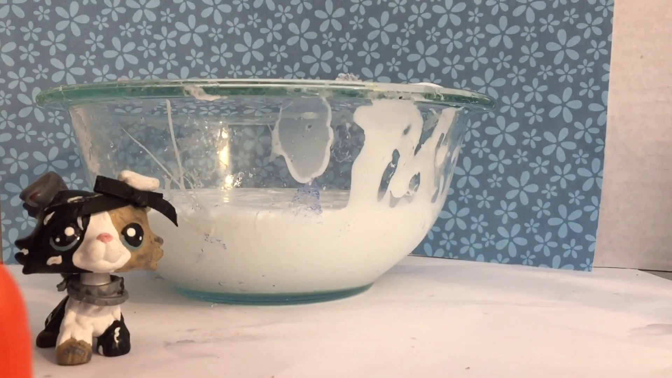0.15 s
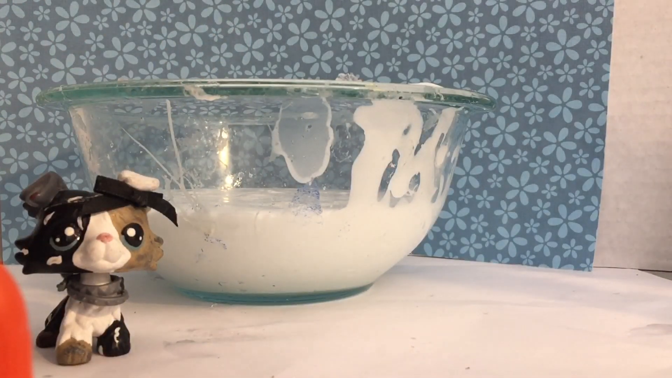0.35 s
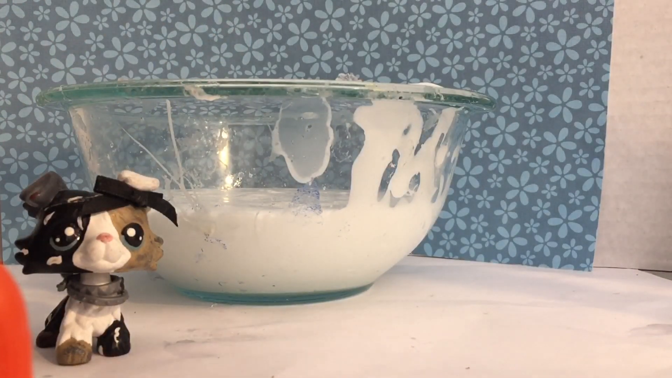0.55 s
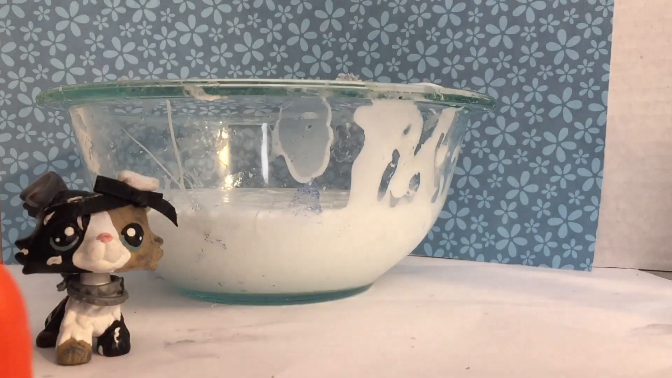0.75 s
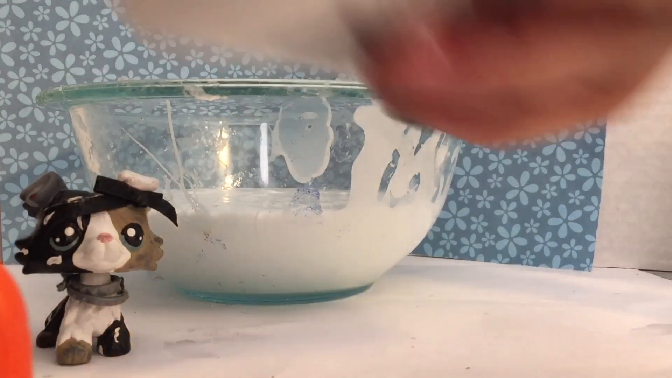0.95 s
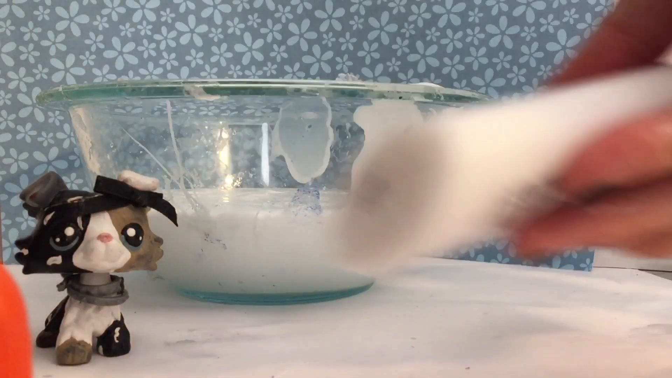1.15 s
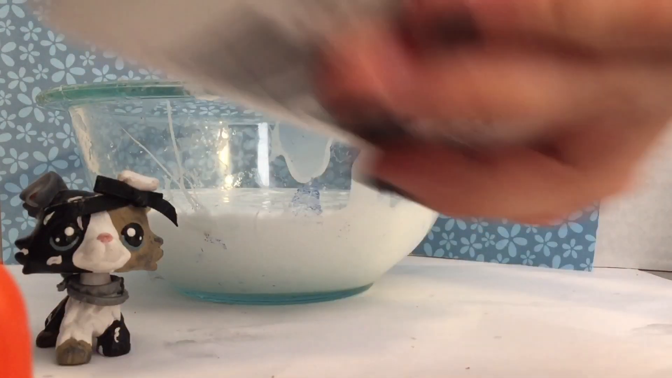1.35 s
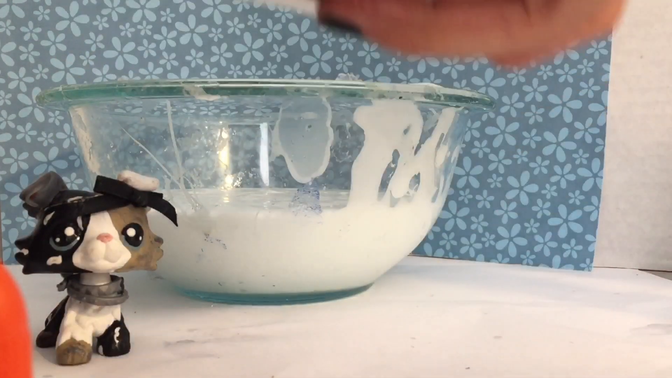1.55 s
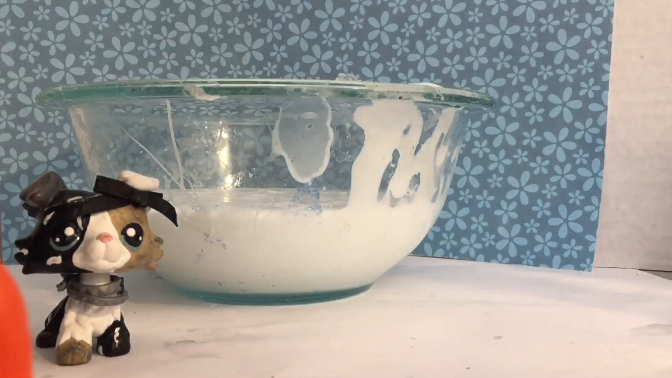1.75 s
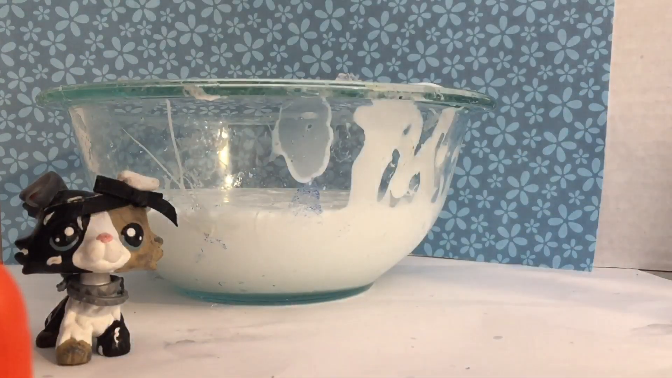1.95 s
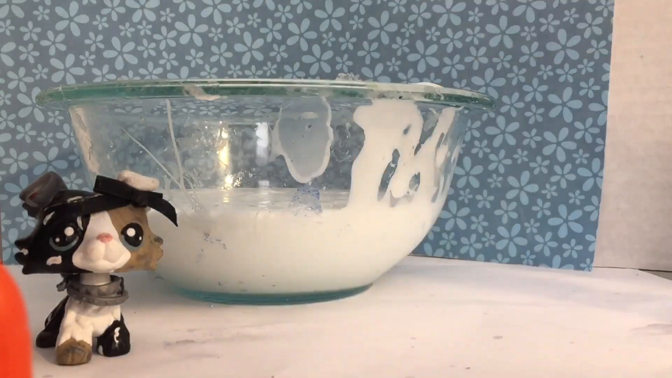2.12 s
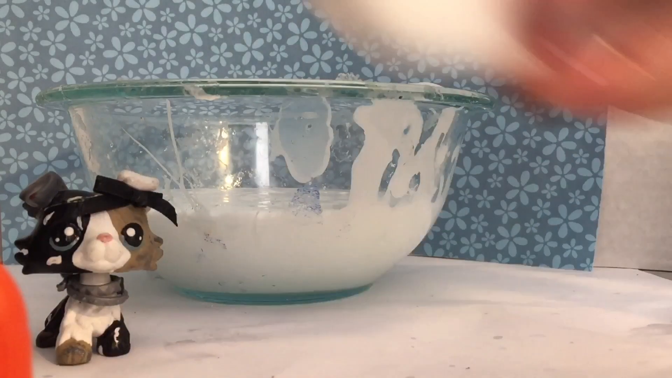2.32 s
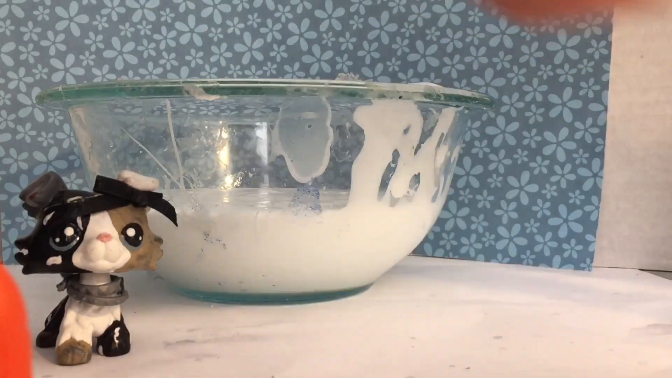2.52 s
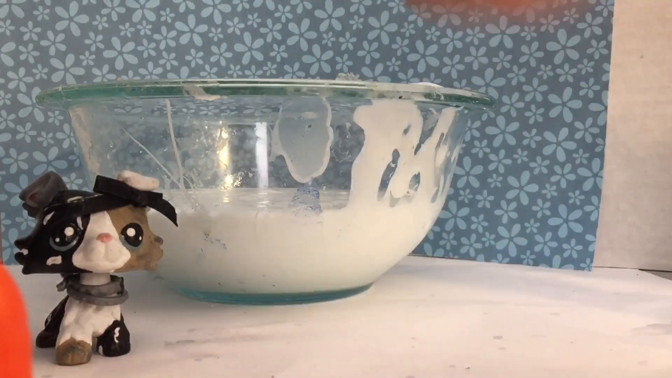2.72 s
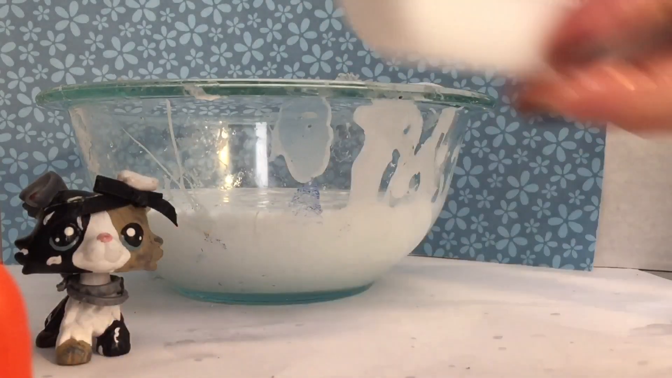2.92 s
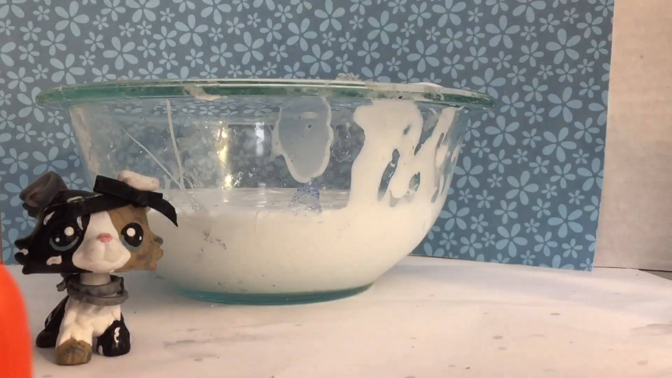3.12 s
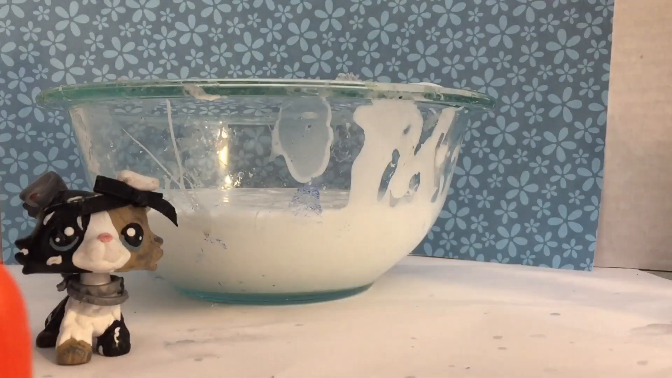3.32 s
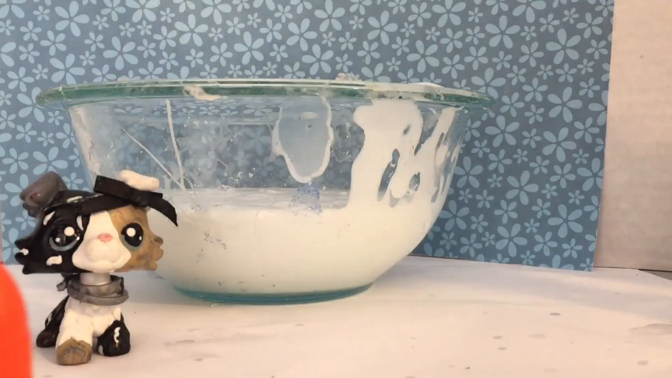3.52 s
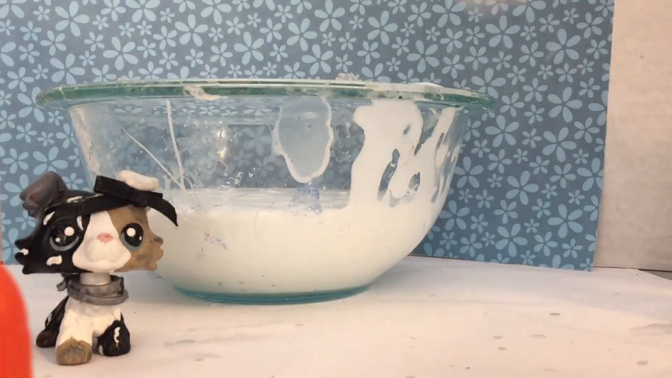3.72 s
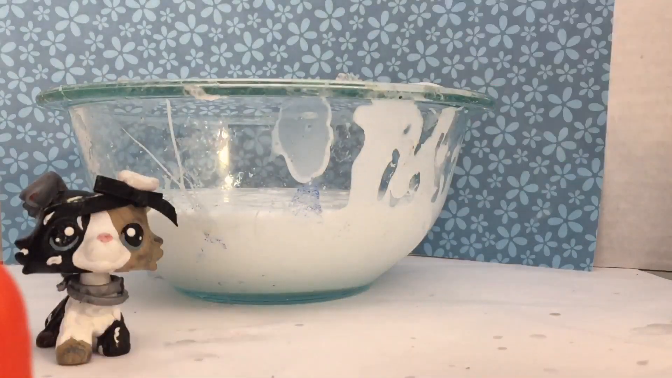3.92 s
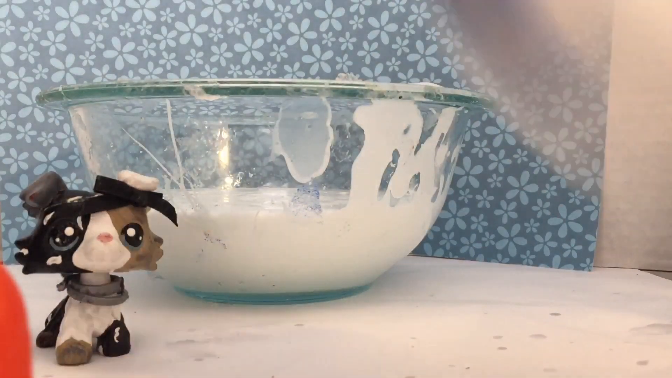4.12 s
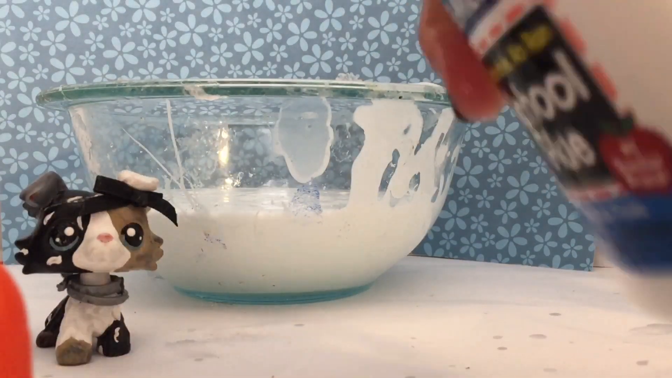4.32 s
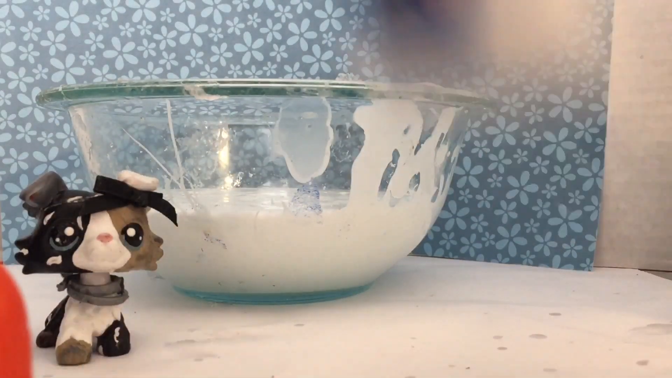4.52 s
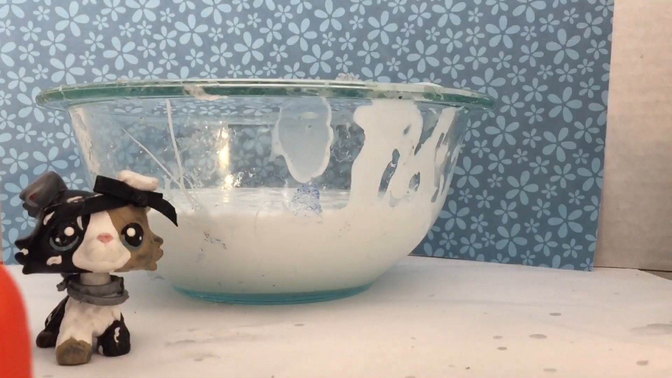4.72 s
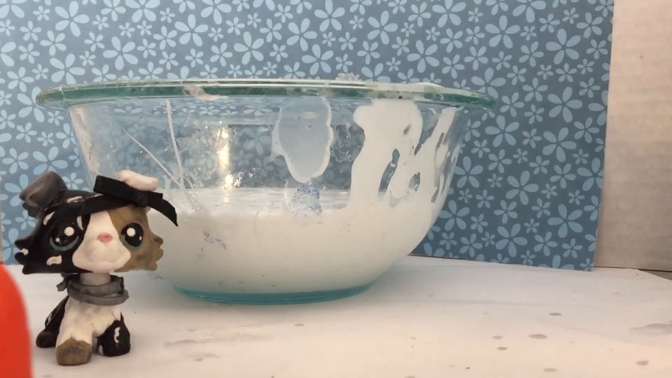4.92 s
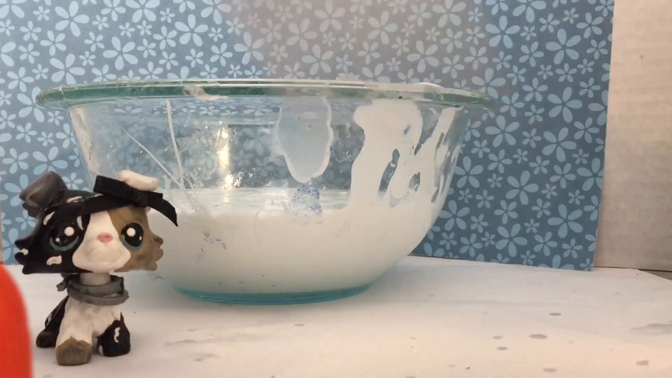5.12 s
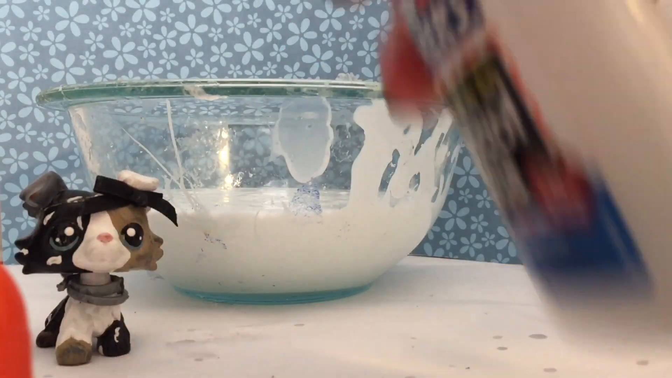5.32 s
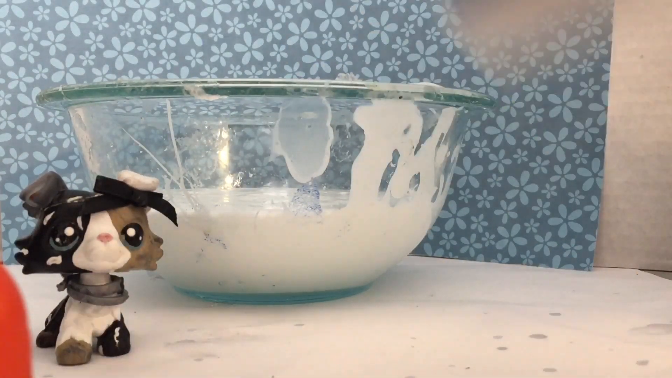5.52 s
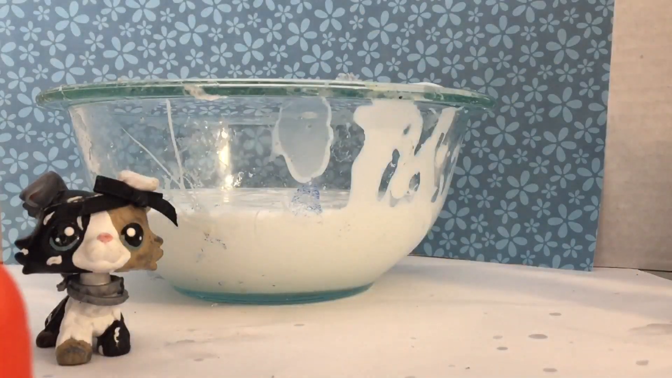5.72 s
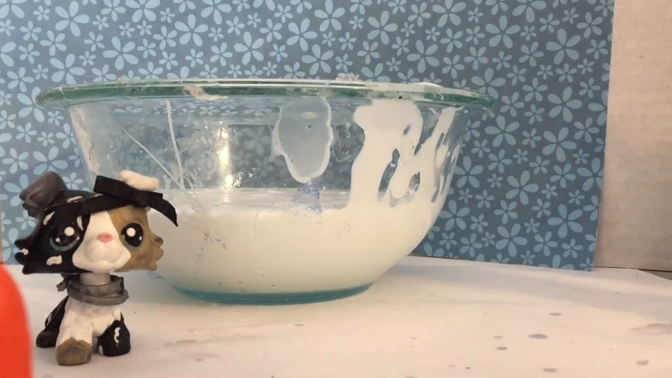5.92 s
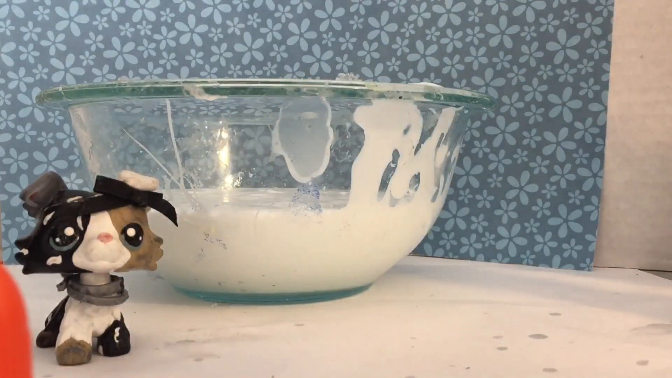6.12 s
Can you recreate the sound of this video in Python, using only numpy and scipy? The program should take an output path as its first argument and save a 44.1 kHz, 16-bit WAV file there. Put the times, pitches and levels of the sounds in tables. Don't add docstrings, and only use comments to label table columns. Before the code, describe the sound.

Close up in a small quiet room, faint clicks and a light table touch come first. Then a soft plastic bottle of thin, watery glue is shaken fast in three bursts, each stroke a bubbly slosh with bright spray and hollow gulps. Finger rings tick on the plastic, a hand thumps the table between bursts, and the last burst is longest and loudest. A faint appliance hum sinks away.

```python
import sys
import numpy as np
from scipy import signal
from scipy.fft import rfft, irfft, next_fast_len
from scipy.io import wavfile
from scipy.ndimage import uniform_filter1d, map_coordinates

SR = 44100
rng = np.random.default_rng(int(sys.argv[2]) if len(sys.argv) > 2 else 0)


def volts_from_db(level):
    exponent = np.asarray(level, float) / 20
    return 10 ** exponent


def wav_out(sig):
    wavfile.write(sys.argv[1], SR, np.round(np.clip(np.atleast_2d(sig).T, -1, 1) * 32767).astype(np.int16))


N = 271215
TIME = np.arange(N) / SR
TOP_HZ = 15900
BUBBLE_HZ = 846


def unit(x):
    return x / np.sqrt(np.mean(x ** 2) + 1e-20)


def along(points, hz):
    f, v = np.transpose(points)
    return np.interp(np.log(hz + 1), np.log(f + 1), v)


def filtered(x, response):
    m = next_fast_len(N + SR // 2)
    return irfft(rfft(x, m) * response(np.fft.rfftfreq(m, 1 / SR)), m)[:N]


def coloured(x, spectrum):
    return unit(filtered(x, lambda hz: volts_from_db(along(spectrum, hz))))


def resonance(f, centre_hz, width_hz):
    damping = 1j * f * width_hz
    return damping / (centre_hz ** 2 - f * f + damping)


def wobble(rate):
    return map_coordinates(rng.standard_normal(int(N * rate / SR) + 4), [TIME * rate])


def patchy(x, depth_db):
    z = signal.stft(x, nperseg=128)[2]
    field = uniform_filter1d(rng.standard_normal(z.shape), size=5, axis=0)
    field = uniform_filter1d(field, size=9, axis=1)
    return signal.istft(z * volts_from_db(depth_db * unit(field)), nperseg=128)[1][:N]


def blips(s, size, hz, cycles, soft, climb):
    life = (cycles / hz)[:, None]
    k = np.arange(-160, 420)
    t = k / SR
    rise = np.exp(-(t / (soft * life)) ** 2)
    fall = np.exp(-(np.abs(t) / (0.21 * life)) ** 0.43)
    shape = np.where(t < 0, rise, fall) * signal.windows.tukey(len(k), 0.2)
    start_phase = rng.random((len(s), 1))
    tone = np.cos(2 * np.pi * (hz[:, None] * (t + climb * t * t / life) + start_phase))
    at = np.clip(np.round(s * SR).astype(int)[:, None] + k, 0, N)
    return np.bincount(at.ravel(), (size[:, None] * shape * tone).ravel(), N + 1)[:N]


def swell(s, db, rise, fall, edge=1.46):
    power = np.zeros(N)
    for at, level, up, down in zip(s, db, rise, fall):
        near = slice(max(int((at - 4 * up) * SR), 0), int((at + 4 * down) * SR))
        t = TIME[near] - at
        distance = np.abs(t / np.where(t < 0, up, down))
        power[near] += volts_from_db(2 * level - 17.45 * distance ** np.where(t < 0, edge, 1.9))
    return power


# [peak t/s, level/dB rms, rise t/s, fall t/s]
FIRST_BURST = [(.824, -76, .042, 0.03), (0.857, -37, 0.0034, 0.01), (.886, -50, 0.043, 0.015),
               (0.943, -34.5, 0.0097, 0.024), (1.021, -32, 0.027, 0.015), (1.08, -32, 0.012, 0.031),
               (1.142, -28, 0.0028, 0.031), (1.23, -26.5, 0.017, 0.017), (1.294, -33.5, 0.038, 0.018),
               (1.366, -31, 0.032, 0.0088), (1.419, -27, 0.025, 0.029), (1.497, -29.5, 0.031, 0.0068),
               (1.547, -32, 0.039, 0.02), (1.586, -34, 0.013, 0.028), (1.626, -40.5, 0.0055, 0.023)]
# [peak t/s, level/dB rms, rise t/s, fall t/s]
SECOND_BURST = [(2.196, -46, 0.046, 0.016), (2.26, -25, 0.021, 0.018), (2.332, -28, 0.025, 0.0059),
                (2.411, -29.5, 0.023, 0.016), (2.479, -27.5, 0.013, 0.015), (2.559, -25, 0.017, 0.01),
                (2.622, -26, 0.027, 0.017), (2.689, -29, 0.01, 0.031), (2.771, -23.5, 0.028, 0.0092),
                (2.834, -37, 0.056, 0.072), (2.9, -21.5, 0.006, 0.0084), (2.97, -32.5, 0.015, 0.065),
                (3.044, -24.5, 0.0099, 0.018), (3.11, -37, 0.021, 0.015), (3.146, -39.5, .026, 0.023)]
# [peak t/s, level/dB rms, rise t/s, fall t/s]
DOWN_STROKES = [(3.821, -27, 0.034, 0.02), (3.983, -25, 0.039, .026), (4.155, -22, 0.048, .0089),
                (4.286, -25.5, 0.028, 0.029), (4.461, -23, 0.029, 0.017), (4.62, -21, 0.021, 0.021),
                (4.795, -22.5, 0.036, 0.017), (4.956, -20, 0.016, 0.023), (5.13, -19.5, 0.029, 0.012),
                (5.297, -23, 0.055, 0.011), (5.447, -23, 0.052, 0.016), (5.621, -26, 0.035, 0.011),
                (5.913, -26, 0.021, 0.028), (6.084, -21.5, 0.023, 0.011)]
# [peak t/s, level/dB rms, rise t/s, fall t/s]
FALL_BACKS = [(3.761, -31, 0.0084, 0.013), (3.911, -25.5, 0.0082, 0.02), (4.084, -34, 0.036, 0.011),
              (4.229, -29, 0.022, 0.039), (4.394, -28, 0.021, 0.0083), (4.551, -32.5, 0.013, 0.04),
              (4.713, -32, 0.012, 0.049), (4.891, -29.5, 0.012, 0.036), (5.053, -25.5, 0.017, 0.028),
              (5.216, -28, 0.0091, 0.011), (5.358, -27, 0.0064, 0.024), (5.542, -32, 0.024, 0.036),
              (5.822, -29, 0.012, 0.0072), (6.008, -33, 0.015, 0.012)]
EXTRA_SPRAY = [
    [.3, .3, .3, 0.25, .3, .3, 0.48, 0.28, .3, .3, 0.33, 0.34, .3, .3, .3],
    [.3, .3, .3, 0.24, 0.297, 0.298, .3, .3, .3, .3, .3, .3, .3, .3, .3],
    [0.32, 0.25, .3, .3, 0.27, .3, .3, 0.26, .3, 0.25, 0.33, .3, 0.33, 0.41],
    [.3, .3, .3, .3, .3, .3, .3, 0.33, .3, .3, .3, .3, .3, .3],
]
# [peak t/s, level/dB rms, half length t/s, bubble f/Hz]
LUMPS = [(0.97, -39, 0.018, 696), (1.696, -42, 0.0056, 526), (2.94, -22, 0.0025, 735),
         (3.23, -38.5, 0.031, 500), (3.33, -59.5, 0.18, 302), (4.037, -32.5, .013, 840),
         (4.498, -39, 0.0077, 1330), (5.332, -29, 0.006, 510), (5.784, -33, 0.0032, 940),
         (5.866, -33, 0.014, 364), (5.977, -35.5, 0.015, 1265)]


def surges():
    rows = [(s, db, half, half, -17.5, hz) for s, db, half, hz in LUMPS]
    strokes = FIRST_BURST + SECOND_BURST + DOWN_STROKES + FALL_BACKS
    for (s, db, rise, fall), extra_db in zip(strokes, sum(EXTRA_SPRAY, [])):
        force_db = db + 29.5
        spray_db = -5 + extra_db - 0.36 * force_db
        rows.append((s, db, rise, fall, spray_db, BUBBLE_HZ * np.exp(-0.013 * force_db)))
    return np.transpose(sorted(rows))


# [f/Hz, width f/Hz, level/dB]
BOTTLE_MODES = [(295, 156, -1), (709, 93, 5.5), (1050, 175, -6), (1613, 326, 0), (3730, 2540, -14.5)]


def bottle(f):
    return sum((-1) ** k * volts_from_db(db) * resonance(f, hz, width)
               for k, (hz, width, db) in enumerate(BOTTLE_MODES))


def slosh(s, pitch_hz, clump):
    at = rng.random(3000) * N / SR
    spread, size, life = rng.standard_normal((3, 3000))
    hz = np.clip(np.interp(at, s, pitch_hz) * np.exp(0.5 * spread), 250, 4000)
    size = volts_from_db(3.1 * np.clip(size, -1.6, 1.6)) * np.minimum(hz / 700, 1) ** 1.13
    bubbles = unit(blips(at, size, hz, 3.1 * np.exp(0.67 * life), soft=0.4, climb=0.054))
    through_wall = unit(filtered(bubbles, bottle))
    turbulence = volts_from_db(6.1 * np.tanh(wobble(160))) * rng.standard_normal(N)
    walls = unit(filtered(turbulence, bottle))
    body = unit(volts_from_db(7.4 * clump) * (0.49 * bubbles + 0.39 * through_wall + 0.49 * walls))
    return unit(body / np.abs(uniform_filter1d(body ** 2, size=700) + 0.05) ** 0.32)


# [f/Hz, level/dB per Hz]
SPRAY_COLOUR = [(1060, 2.5), (1800, -10), (2300, -12.5), (4020, -5), (7560, -10), (9590, -12.5),
                (11200, -19.5), (14900, -19), (16000, -25)]


def fine_spray(clump):
    at, spread = rng.random(7000) * N / SR, rng.random(7000)
    size, life = rng.standard_normal((2, 7000))
    size = volts_from_db(6 * np.clip(size, -1.8, 1.6))
    drops = unit(blips(at, size, 1500 * 7.63 ** spread, 4.04 * np.exp(0.7 * life), soft=0.39, climb=0.076))
    mist = volts_from_db(2.8 * wobble(250)) * rng.standard_normal(N)
    crackle = np.diff(volts_from_db(6 * np.clip(wobble(420), -3, 2)) * mist, prepend=0)
    mix = 0.8 * drops + 0.67 * unit(mist) + 0.83 * unit(crackle)
    return coloured(patchy(volts_from_db(3.34 * clump) * mix, depth_db=3.5), SPRAY_COLOUR)


# [t/s, level/dB]
WALL_FLOW = [(.78, -87), (.86, -54.5), (1.1, -44), (1.58, -40.5), (1.68, -59.5), (1.78, -73), (2.08, -68),
             (2.2, -44), (2.45, -39.5), (3.1, -45.5), (3.28, -75), (3.66, -80), (3.7, -76), (3.76, -49.5),
             (4.9, -48.5), (5.6, -48.5), (6.15, -43.5)]


def liquid():
    s, db, rise, fall, spray_db, pitch_hz = np.transpose(surges().T)
    flow_s, film_db = np.transpose(WALL_FLOW)
    trickle_db = -55 + 0.75 * (film_db - np.median(film_db))
    trickle = volts_from_db(2 * np.interp(TIME, flow_s, trickle_db))
    slosh_level = np.sqrt(swell(s, db - 0.5, rise, fall) + trickle)
    spray_level = np.sqrt(swell(s, db + spray_db, 1.04 * rise, 1.014 * fall, edge=2.2))
    clump = np.tanh(wobble(110))
    body, spray = slosh(s, pitch_hz, clump), fine_spray(clump)
    film = unit(filtered(volts_from_db(1.04 * wobble(90)) * spray[::-1], lambda f: 2.0 + 1 / (1 + (f / 6000) ** 2)))
    return slosh_level * body + spray_level * spray + volts_from_db(np.interp(TIME, flow_s, film_db)) * film


# [peak t/s, level/dB, f/Hz]
BIG_POCKETS = [(1.276, -9, 730), (1.525, -15, 1050), (2.2499, -16, 620), (2.3109, -13, 824),
               (2.3275, -10.5, 1050), (2.3983, -17, 1130), (2.731, -16, 900), (2.7428, -6.5, 706),
               (2.7669, -9, 1000), (2.9008, -4, 810), (3.0419, -10.5, 350), (3.1696, -16, 850),
               (3.913, -9, 1050), (4.2766, -5.5, 705), (4.3782, -12, 760), (4.431, -14, 900),
               (4.4383, -10, 820), (4.4624, -4.5, 685), (4.4678, -9, 610), (4.621, -2.5, 680),
               (4.89, -15.5, 1270), (4.9522, -9, 700), (4.9627, -21, 425), (5.065, -2.5, 640),
               (5.108, -2.5, 940), (5.1199, -4.5, 684), (5.214, -12.5, 850), (5.3551, -12, 960),
               (5.4207, -12, 950), (5.611, -2.5, 604), (5.9227, -12, 1160), (6.0848, -9, 442)]
# [peak t/s, level/dB, f/Hz]
SMALL_POCKETS = [(0.8565, -26.5, 1300), (1.433, -21, 1230), (2.415, -17, 1550), (2.477, -19, 1650),
                 (2.9, -19.5, 2800), (2.9832, -17, 1570), (3.0456, -12.5, 2000), (3.9765, -7.5, 1860),
                 (4.2842, -11, 3000), (4.2933, -15.5, 2100), (4.2981, -19, 1720), (4.6313, -11, 1480),
                 (4.777, -11.5, 2830), (4.7877, -14, 1430), (4.9622, -12, 1770), (5.05, -15, 3000),
                 (5.1087, -18, 2520), (5.13, -15, 1650), (5.4315, -5, 1680), (5.6205, -11.5, 1600),
                 (5.7249, -13.5, 2320), (5.911, -15, 2230), (5.9784, -20, 1610), (6.084, -11, 2070)]


def gulps():
    s, db, hz = np.transpose(BIG_POCKETS + SMALL_POCKETS)
    cycles = 4.53 * np.exp(0.03 * (-13 - db)) * (hz / BUBBLE_HZ) ** 0.23
    return blips(s, volts_from_db(db - 3.5), hz, 0.65 * cycles, soft=0.57, climb=0.014)


# [peak t/s, level/dB, f/Hz]
PLOPS = [(0.9624, -26, 1550), (1.0093, -27, 3270), (1.333, -20.5, 1120), (1.3661, -21, 690),
         (1.4002, -23, 3360), (1.479, -29, 1810), (1.5231, -25, 690), (1.5801, -30, 960),
         (2.2488, -25, 3450), (2.4382, -28.9, 1640), (2.4528, -22, 1030), (2.4813, -25.1, 2670),
         (2.5178, -25, 600), (2.6886, -15, 705), (2.709, -21, 1380), (2.7305, -30, 2840),
         (2.8994, -19.5, 3600), (2.974, -24, 1720), (3.081, -26, 690), (3.1465, -27.5, 950),
         (3.7595, -28.5, 1900), (3.761, -21.5, 1130), (3.8189, -22, 1630), (3.9124, -19, 3450),
         (3.984, -15, 1830), (4.0841, -29, 4050), (4.1075, -18, 520), (4.1276, -28, 3360),
         (4.1551, -17, 3960), (4.2277, -18, 600), (4.2975, -23, 1640), (4.3113, -24, 3930),
         (4.5376, -23, 950), (4.6007, -11.5, 786), (4.6215, -24, 1650), (4.642, -14, 694),
         (4.7082, -17, 705), (4.889, -20.5, 4130), (4.9523, -13, 680), (4.9641, -17.5, 3080),
         (5.0303, -23.5, 430), (5.0641, -25, 3380), (5.1293, -21, 1640), (5.2166, -26, 2500),
         (5.257, -18, 1470), (5.2685, -25.2, 2500), (5.3572, -15.5, 3190), (5.3634, -16, 950),
         (5.4502, -13.5, 670), (5.4558, -18, 1640), (5.5691, -21, 690), (5.6216, -27, 2760),
         (5.668, -36, 2330), (5.7848, -28.5, 1460), (5.8026, -27.4, 1460), (5.8175, -20, 1140),
         (5.864, -23, 1120), (5.889, -23, 3620), (5.8895, -28.7, 1790), (5.91, -21, 4050)]
# [t/s, peak level/dB, centre f/Hz]
SPITS = [(0.7938, -38, 15330), (0.8359, -27, 9300), (0.8897, -37, 4650), (1.022, -24, 4760),
         (1.146, -22.5, 12430), (1.1908, -30, 9650), (1.212, -21.5, 5680), (1.2872, -33.5, 13260),
         (1.2944, -19, 15400), (1.3168, -35, 15330), (1.3256, -25, 12100), (1.421, -23, 15330),
         (1.4337, -20, 9820), (1.4778, -34, 4650), (1.4943, -19, 5450), (1.5017, -29.6, 4650),
         (1.6159, -23.8, 13260), (2.24, -28, 10680), (2.352, -19.5, 9700), (2.4656, -30, 13850),
         (2.476, -21.5, 4650), (2.6246, -19, 4650), (2.6517, -22, 12580), (2.734, -23, 9300),
         (2.7537, -18, 4760), (2.7574, -13, 13780), (2.899, -14, 9300), (2.8996, -15, 4650),
         (2.929, -27.5, 13260), (3.0256, -26, 15300), (3.8223, -22.5, 11760), (4.0005, -25.2, 5510),
         (4.2085, -32, 5860), (4.2827, -23, 4650), (4.3378, -32.5, 15400), (4.3482, -23, 8700),
         (4.3506, -36.4, 14810), (4.3798, -31, 4650), (4.4457, -24.1, 4650), (4.4894, -38, 15330),
         (4.6329, -28.5, 13700), (4.7129, -35, 15160), (4.7416, -30.0, 4650), (4.7518, -28, 9400),
         (4.9408, -31, 15400), (5.1263, -28, 4650), (5.2156, -18, 7410), (5.3214, -40.1, 15330),
         (5.3574, -15, 5360), (5.4473, -28, 12300), (5.4926, -34, 12400), (5.5755, -30, 4650),
         (5.6115, -23.3, 4650), (5.977, -24, 4650), (6.0623, -16, 12400)]


def droplets():
    s, db, hz = np.transpose(PLOPS)
    out = blips(s, volts_from_db(db - 1.0), hz, 3.4 * (hz / BUBBLE_HZ) ** 0.5, soft=0.45, climb=0.022)
    s, db, hz = np.transpose(SPITS)
    for detune in np.exp(0.17 * rng.standard_normal((3, len(s)))):
        out = out + blips(s, volts_from_db(db - 8), np.minimum(hz * detune, TOP_HZ), 8, soft=0.6, climb=0.01)
    return out


# [t/s, peak level/dB, centre f/Hz]
FINGER_CLICKS = [(0.1797, -41.5, 10300), (0.224, -43.5, 11200), (0.2797, -52, 8400), (0.4744, -55, 2610),
                 (0.5077, -41, 10800), (0.5281, -45, 9900), (0.6425, -52, 4260), (0.697, -42, 6700)]
# [t/s, peak level/dB, centre f/Hz]
WET_SNAPS = [(0.793, -31.5, 2720), (0.822, -32, 5600), (0.854, -29, 2560), (1.2115, -20, 6200),
             (1.294, -19, 9100), (1.476, -22, 2970), (1.551, -16, 2300), (1.6152, -24, 9900),
             (1.694, -36, 2570), (1.8232, -44, 2630), (2.106, -43, 3990), (2.1503, -29, 5550),
             (2.1963, -18, 9300), (2.2383, -37, 3600), (2.3203, -23, 1910), (2.4735, -14, 9700),
             (2.7283, -17.5, 2040), (2.8847, -25, 6800), (2.8979, -14, 2930), (2.928, -25.5, 2100),
             (3.039, -12, 2000), (3.107, -34, 3190), (3.163, -46, 11040), (3.21, -42.5, 9520),
             (3.226, -41, 12000), (3.243, -37, 13000), (3.316, -52.5, 11960), (3.354, -46.5, 9900),
             (3.58, -45.5, 8900),
             (3.745, -29.5, 3920), (3.758, -19.5, 1930), (3.905, -11, 4300), (4.116, -36, 8940),
                    (4.2026, -32, 6420), (4.281, -22, 3260), (4.334, -27.5, 14600), (4.341, -29.5, 14400),
                    (4.376, -35.5, 12100), (4.536, -31.5, 5000), (4.4355, -20.5, 2860),
                    (4.706, -27.5, 4100), (4.877, -21, 4120), (5.1252, -13, 3130), (5.214, -27, 3380),
                    (5.4455, -19, 2560), (5.512, -29, 3980), (5.6187, -12.5, 5870), (5.771, -34, 8700),
                    (5.7814, -41, 2340), (5.803, -32, 2030), (5.889, -21.5, 2330), (6.051, -22, 3800)]


def snaps():
    out, t = np.zeros(N + SR), np.arange(600) / SR
    f = np.fft.rfftfreq(1024, 1 / SR)
    for s, db, hz in FINGER_CLICKS + WET_SNAPS:
        crack = rng.standard_normal(len(t)) * volts_from_db(-60 * t / 0.0095) * (1 - np.exp(-t / 0.00062))
        bright_floor = 0.23 * 1j * f / (6000 + 1j * f)
        crack = irfft(rfft(crack, 1024) * (resonance(f, hz, 0.13 * hz) + bright_floor), 1024)
        out[round(s * SR):][:1024] += volts_from_db(db) * crack / np.abs(crack).max()
    return out[:N]


# [t/s, peak level/dB]
RING_TAPS = [(0.147, -47), (0.1998, -45), (0.4622, -47), (1.051, -23.5), (1.079, -24), (1.6432, -32),
             (1.7988, -45), (2.3395, -18), (2.351, -22), (2.4934, -10), (3.2077, -56), (3.2425, -30),
             (3.251, -32), (4.553, -27.5), (4.565, -36), (4.7, -28), (1.023, -24), (3.302, -36),
             (3.3392, -39.5), (3.355, -39), (3.376, -37), (3.413, -42), (3.5747, -43.5), (3.689, -21),
             (4.097, -25), (4.5377, -23), (4.8634, -26), (5.3863, -16)]
# [t/s, length t/s, level/dB]
RING_SQUEAKS = [
    (5.363, 0.021, -26),
    (5.953, 0.011, -38.5),
]


def rings():
    out, t = np.zeros(N + SR), np.arange(SR // 10) / SR
    for s, db in RING_TAPS:
        tune, upper, lower = rng.standard_normal(3)
        main = np.sin(2 * np.pi * (9640 + 60 * tune) * t) * volts_from_db(-60 * t / 0.014)
        sides = volts_from_db(1.2 * upper) * np.sin(2 * np.pi * 10150 * t)
        sides = sides + volts_from_db(3.5 * lower) * np.sin(2 * np.pi * 9150 * t)
        tones = (main + 0.4 * sides * volts_from_db(-60 * t / 0.012)) * (1 - np.exp(-t / 0.0007))
        tick = 0.085 * np.diff(rng.standard_normal(len(t) + 2), 2) * volts_from_db(-60 * t / 0.005)
        out[round(s * SR):][:len(t)] += volts_from_db(db - 1) * (tones + tick)
    for s, length, db in RING_SQUEAKS:
        held = np.sin(np.pi * np.clip(t / length, 0, 1)) ** 0.52
        out[round(s * SR):][:len(t)] += volts_from_db(db) * held * np.sin(2 * np.pi * 9630 * t)
    return out[:N]


# [t/s, peak level/dB, f/Hz]
TABLE_BUMPS = [
    (0.225, -41.5, 260),
    (0.525, -37, 270),
    (0.65, -52, 271),
    (0.813, -42.5, 366),
    (0.838, -38.5, 375),
    (1.824, -23, 268),
]


def bumps():
    s, db, hz = np.transpose(TABLE_BUMPS)
    knock = blips(s + 0.004, volts_from_db(db), hz, 3.5, soft=0.65, climb=-0.016)
    give = blips(s + 0.0069, volts_from_db(db - 12), 0.28 * hz, 0.49, soft=0.52, climb=0)
    blows = np.bincount(np.round((s + 0.0034) * SR).astype(int), volts_from_db(db + 16), N)
    return knock + give + filtered(blows, lambda f: resonance(f, 330, 30))


# [t/s, peak level/dB, f/Hz]
POPS = [(.226, -48, 1140), (0.521, -54, 1050), (0.651, -51, 1750), (0.798, -46.5, 2750), (0.836, -40, 5360),
        (0.845, -48, 2800), (0.887, -30, 5700), (0.908, -39, 1390), (0.984, -31, 895), (1.752, -50, 1200),
        (1.925, -53, 1050), (3.058, -20.5, 905), (1.715, -27, 1320), (1.715, -33, 2440),
        (1.721, -44.5, 600), (1.823, -38, 1143), (2.938, -18.5, 663), (3.209, -21, 486),
        (3.225, -26.5, 1590), (3.758, -21.5, 358), (4.512, -25.5, 1510), (5.727, -18.5, 1680),
        (5.727, -27.5, 620)]


def pops():
    s, db, hz = np.transpose(POPS)
    return blips(s, volts_from_db(db), hz, 6.9, soft=0.33, climb=0.01)


# [peak t/s, fall t/s, level/dB]
SKIN_SLIDES = [
    (0.075, 0.039, -62.5),
    (.275, 0.012, -60),
    (3.685, 0.061, -52),
]


def slides():
    s, fall, db = np.transpose(SKIN_SLIDES)
    rough = volts_from_db(3.9 * wobble(220)) * rng.standard_normal(N)
    slide = coloured(rough, [(2000, -21), (6000, -10), (9000, -6), (16000, -16)])
    return np.sqrt(swell(s, db, 0.3 * fall, fall)) * slide


# [f/Hz, t60 t/s]
ROOM_DECAY = [(200, 0.16), (2000, 0.13), (8000, 0.054)]


def room(x):
    hz, t, z = signal.stft(rng.standard_normal(SR // 2), SR, nperseg=256)
    decay = volts_from_db(-60 * t / along(ROOM_DECAY, hz)[:, None])
    tail = signal.istft(z * decay, SR, nperseg=256)[1]
    return signal.fftconvolve(np.pad(x, (200, 0)), tail / np.linalg.norm(tail))[:N]


# [t/s, level/dB]
ARM_LEVEL = [(0.0, -55.5), (.68, -51), (.75, -83), (.82, -43), (1.4, -76), (1.51, -41.5), (1.61, -66),
             (1.78, -61), (1.83, -49), (1.92, -62.5), (3.05, -55.5), (4.38, -44), (4.74, -55.5),
             (5.65, -49.5), (5.94, -57), (6.15, -53)]
# [f/Hz, level/dB per Hz]
RUMBLE_COLOUR = [(25, -27.5), (42, -28), (56, 15), (75, -0.5), (100, -10.5), (200, -50)]


def arm_rumble():
    level_db = np.interp(TIME, *np.transpose(ARM_LEVEL)) + 1.1 * wobble(17)
    return volts_from_db(level_db) * coloured(rng.standard_normal(N), RUMBLE_COLOUR)


# [f/Hz, level/dB rms]
HUM_PARTIALS = [(57.4, -70.5), (119, -60), (167, -67), (240, -72.5), (350, -82), (312, -69.5), (705, -77.5)]


def appliance():
    hum = np.zeros(N)
    for hz, db in HUM_PARTIALS:
        hum += volts_from_db(db + 2.5 * wobble(14)) * np.sin(2 * np.pi * (hz * TIME + 0.13 * wobble(16)))
    return hum * volts_from_db(-9 * np.clip(TIME - 2.2, 0, 1))


# [f/Hz, level/dB per Hz]
AIR_COLOUR = [(30, -27), (80, 4), (140, 2), (200, -6.5), (310, 0), (520, -16.5), (1500, -19), (4000, -27),
              (9000, -30.5), (16000, -33.5)]


def room_tone():
    return volts_from_db(-61.5 + 0.53 * wobble(3.0)) * coloured(rng.standard_normal(N), AIR_COLOUR)


def scene():
    near = liquid() + gulps() + droplets() + snaps() + bumps() + pops() + slides()
    background = arm_rumble() + appliance() + room_tone()
    return (near + volts_from_db(-17.5) * room(near) + rings() + background)[None]


def low_pass(x):
    return signal.sosfilt(signal.butter(12, 16970, fs=SR, output="sos"), x)


def record(dry):
    mix = filtered(dry[0], lambda hz: (hz < TOP_HZ) / (1 + (38 / (hz + 1)) ** 4))[None]
    return low_pass(mix)


dry = scene()
out = record(dry)
wav_out(out)
```